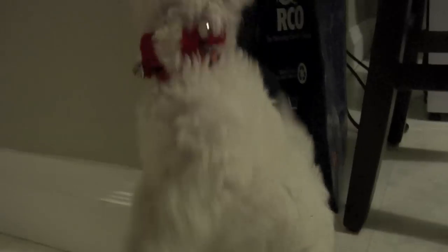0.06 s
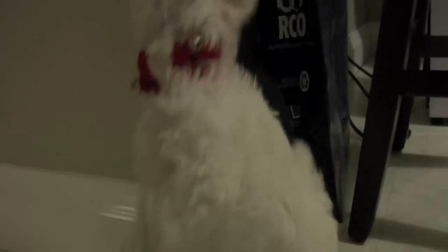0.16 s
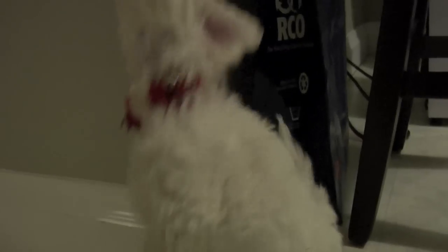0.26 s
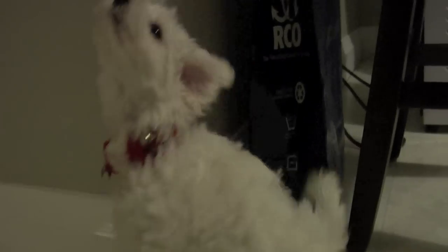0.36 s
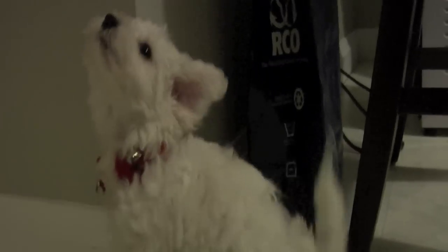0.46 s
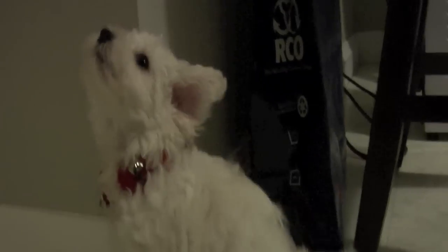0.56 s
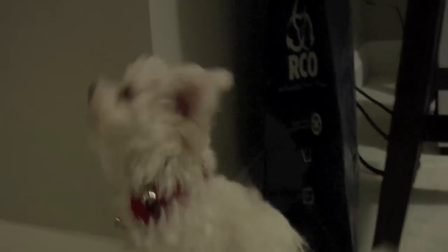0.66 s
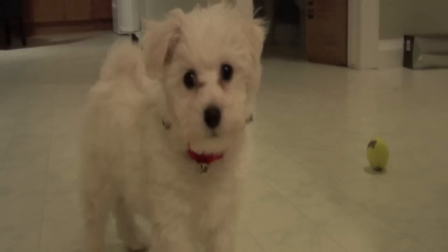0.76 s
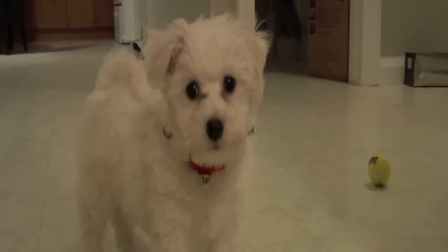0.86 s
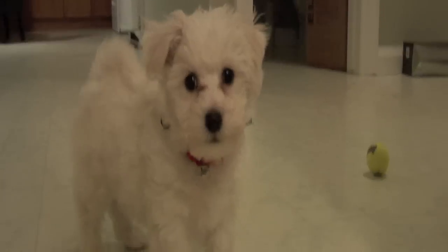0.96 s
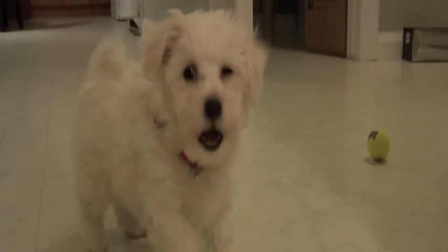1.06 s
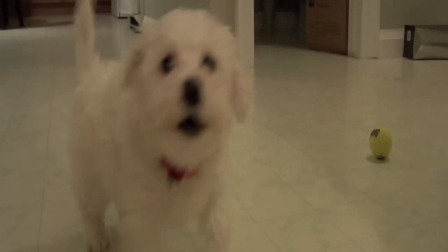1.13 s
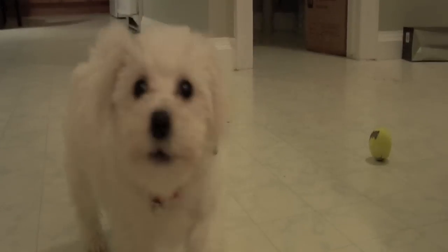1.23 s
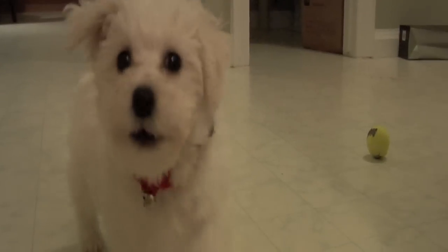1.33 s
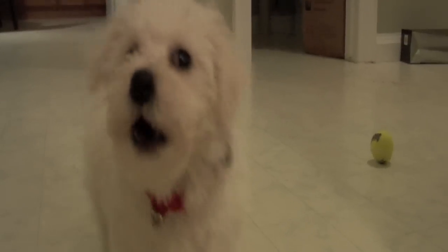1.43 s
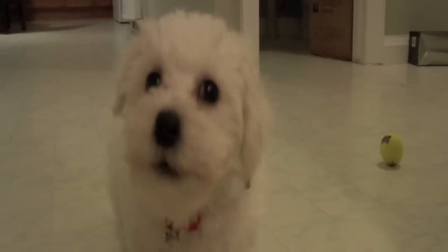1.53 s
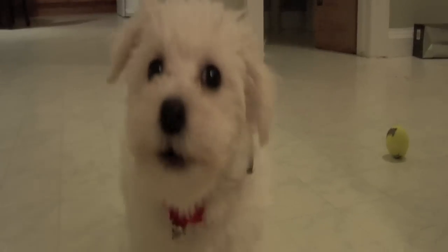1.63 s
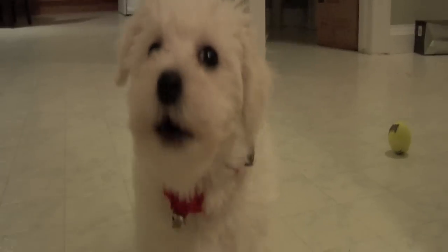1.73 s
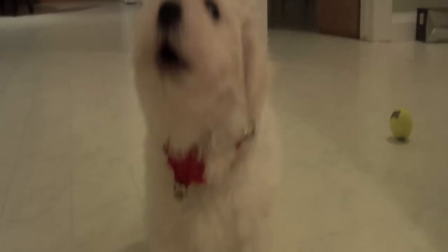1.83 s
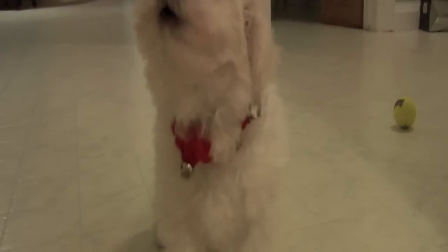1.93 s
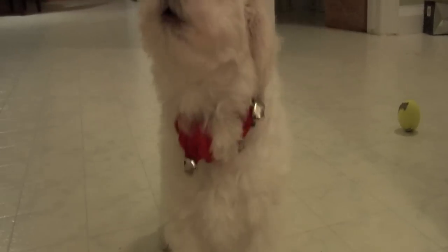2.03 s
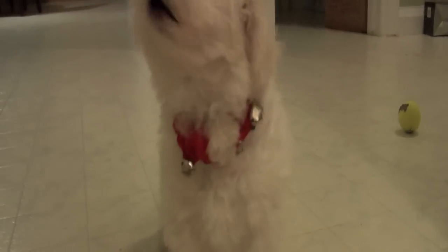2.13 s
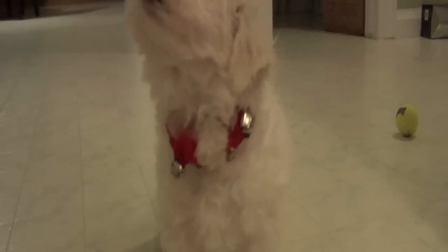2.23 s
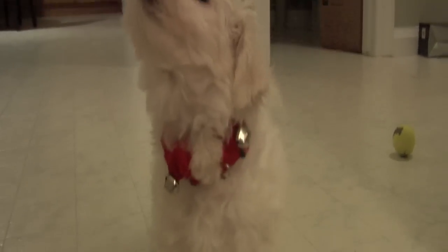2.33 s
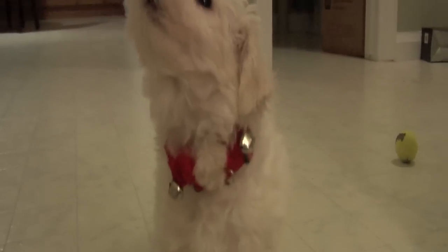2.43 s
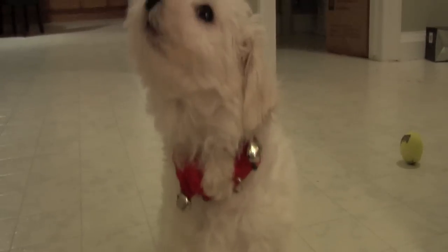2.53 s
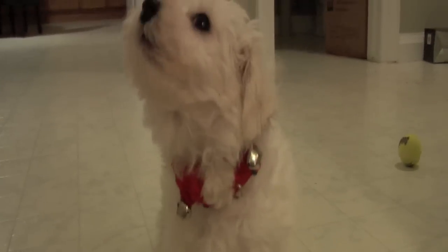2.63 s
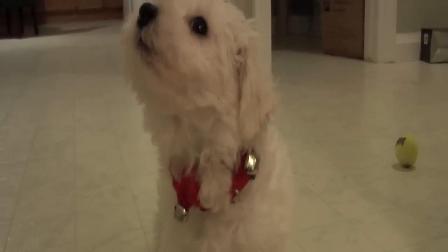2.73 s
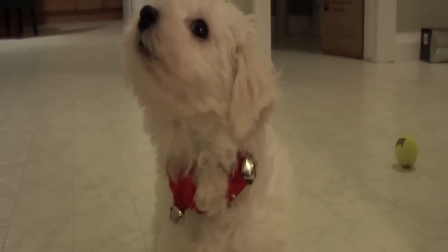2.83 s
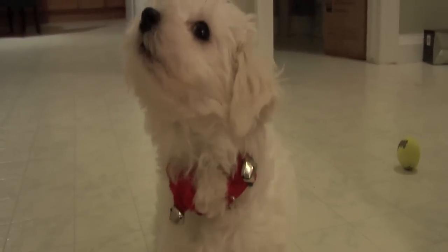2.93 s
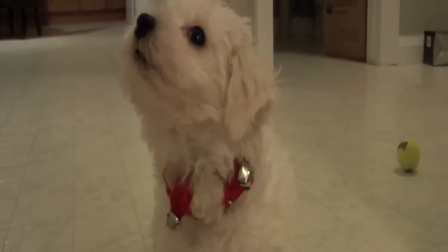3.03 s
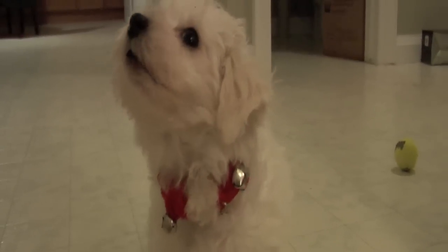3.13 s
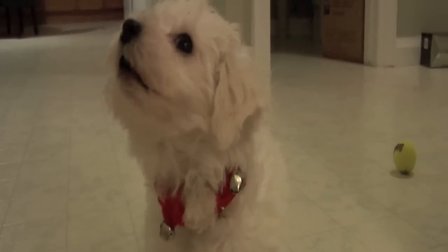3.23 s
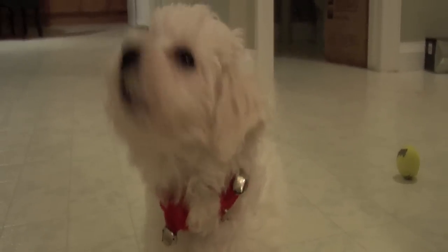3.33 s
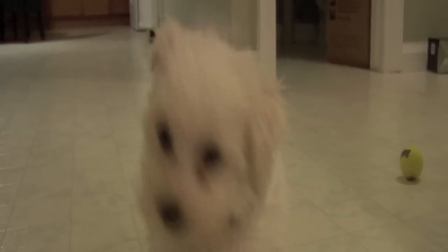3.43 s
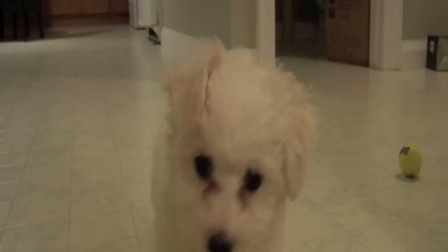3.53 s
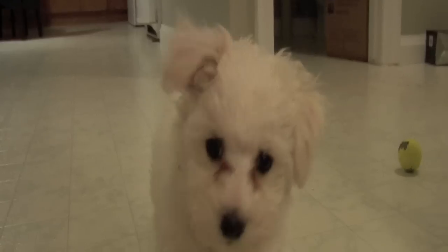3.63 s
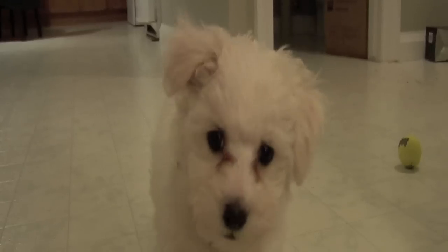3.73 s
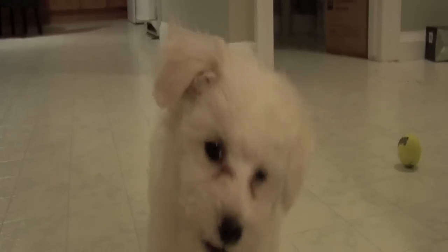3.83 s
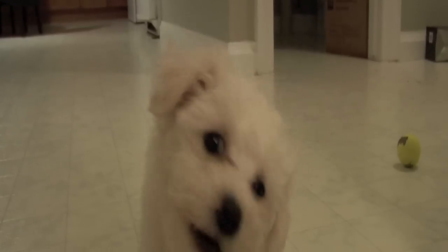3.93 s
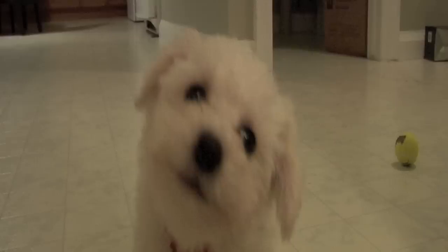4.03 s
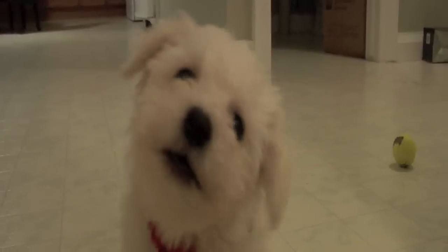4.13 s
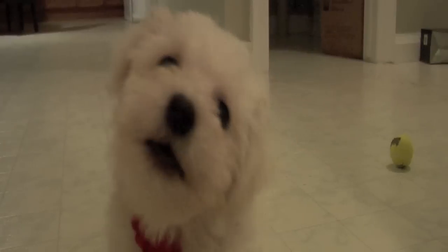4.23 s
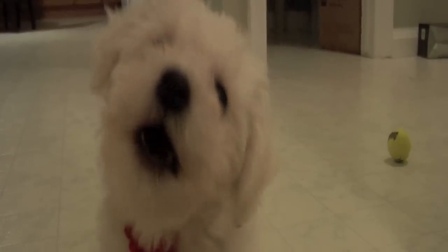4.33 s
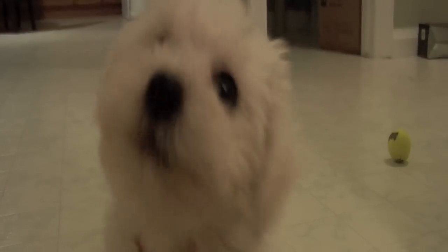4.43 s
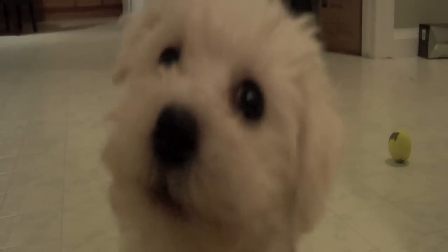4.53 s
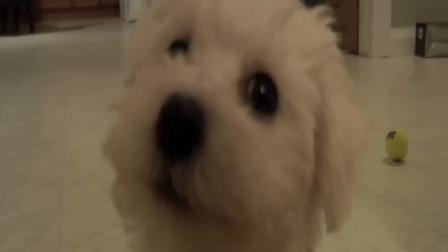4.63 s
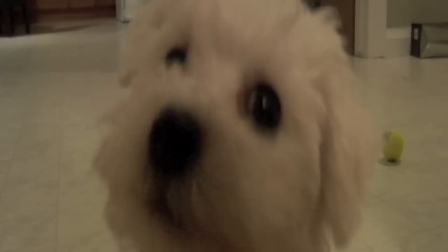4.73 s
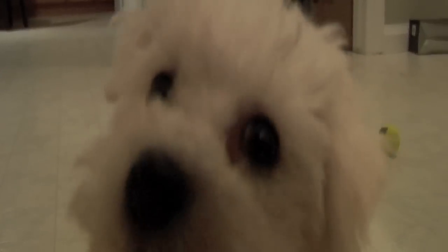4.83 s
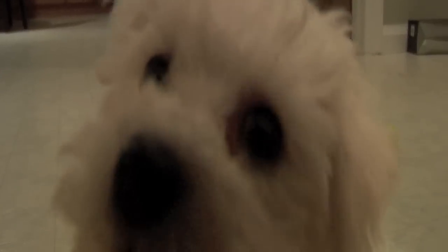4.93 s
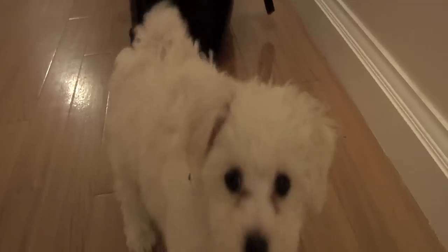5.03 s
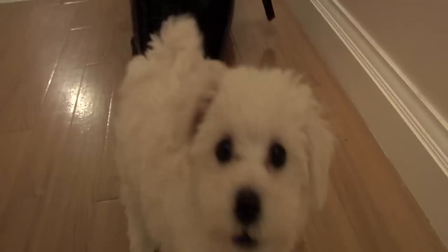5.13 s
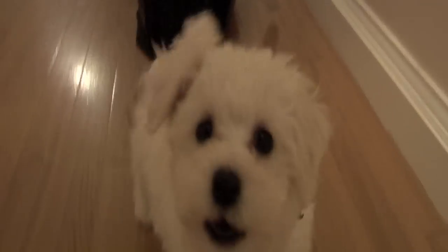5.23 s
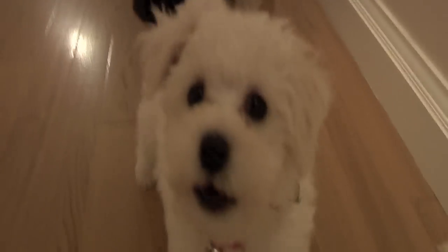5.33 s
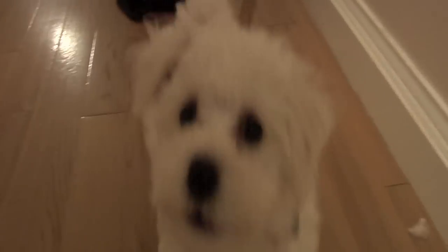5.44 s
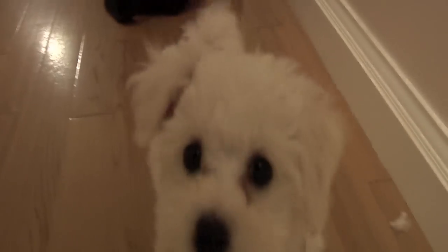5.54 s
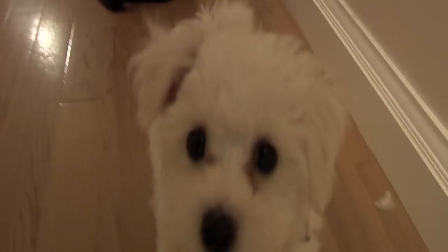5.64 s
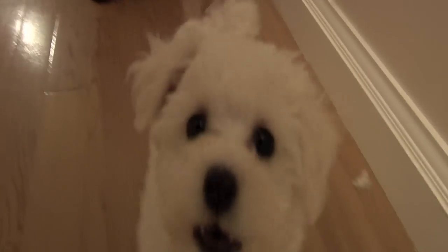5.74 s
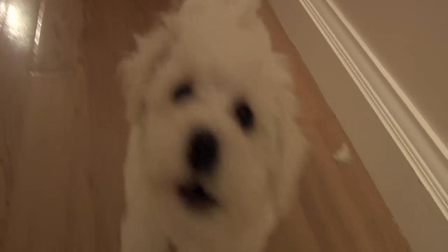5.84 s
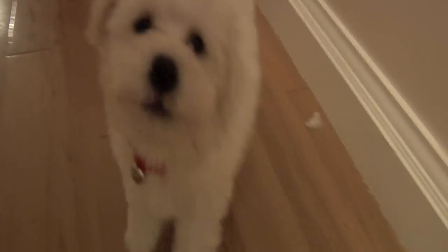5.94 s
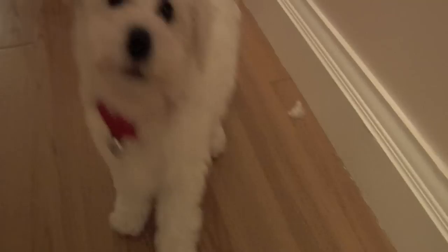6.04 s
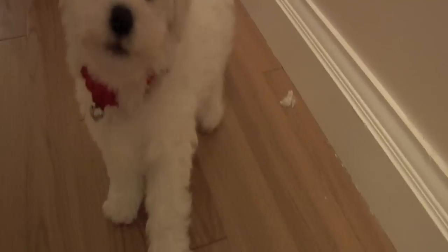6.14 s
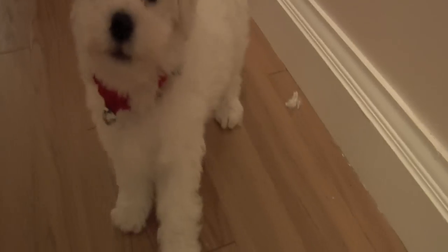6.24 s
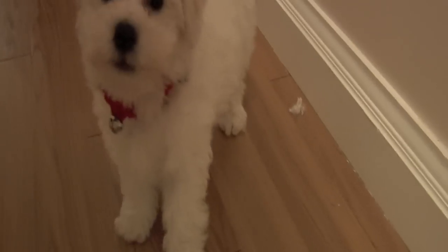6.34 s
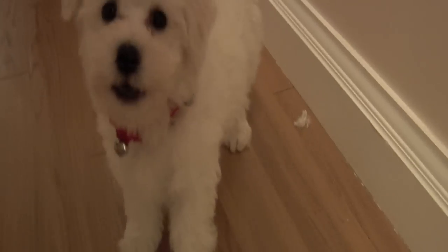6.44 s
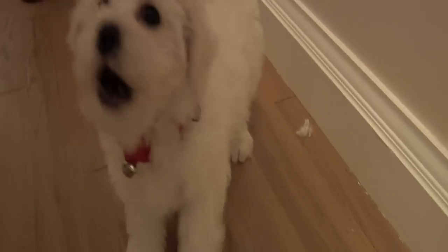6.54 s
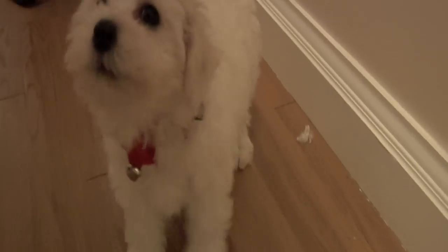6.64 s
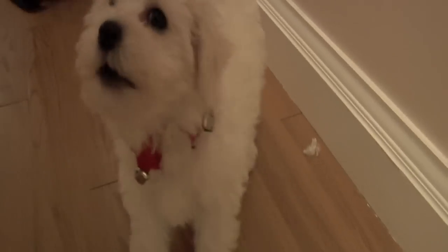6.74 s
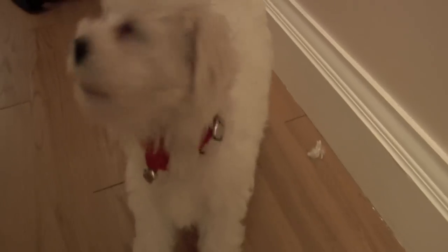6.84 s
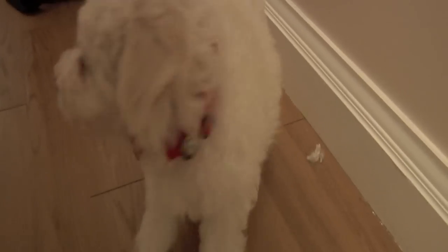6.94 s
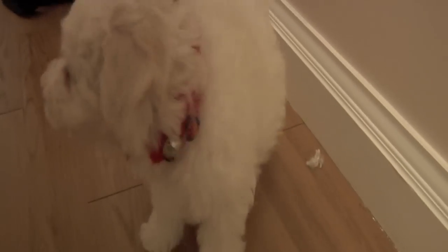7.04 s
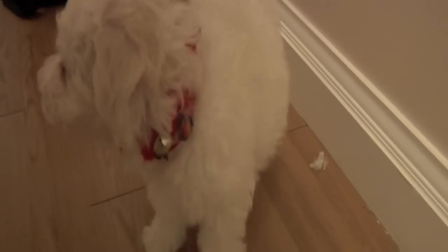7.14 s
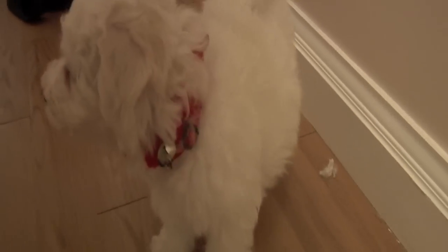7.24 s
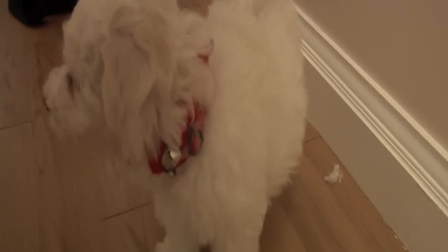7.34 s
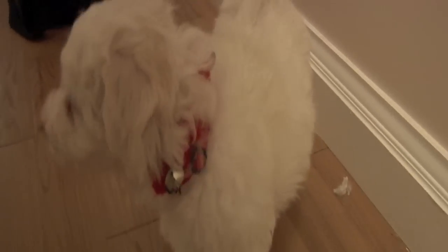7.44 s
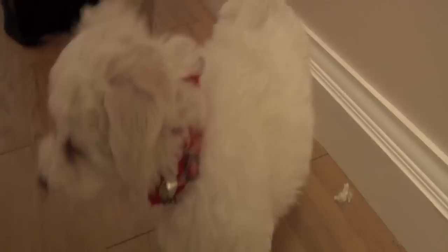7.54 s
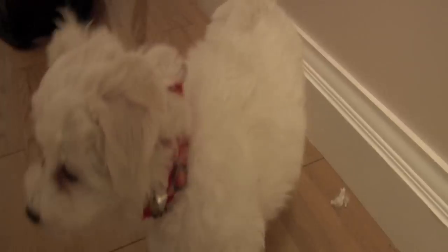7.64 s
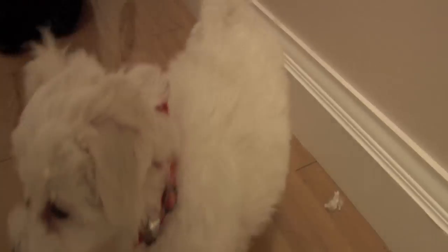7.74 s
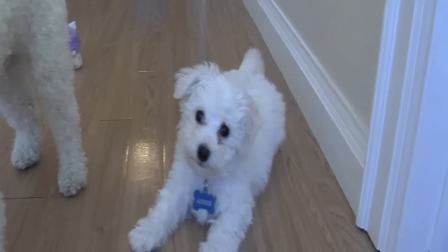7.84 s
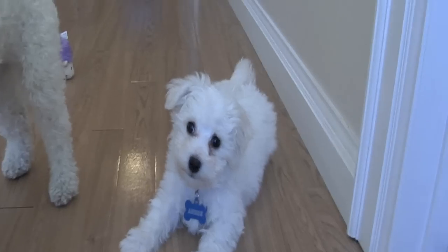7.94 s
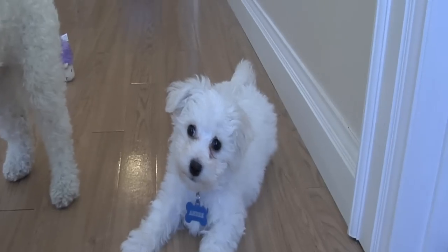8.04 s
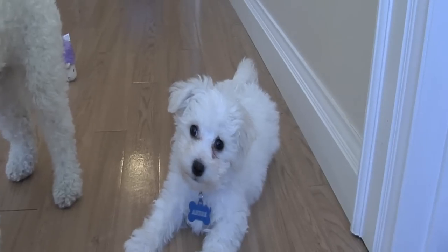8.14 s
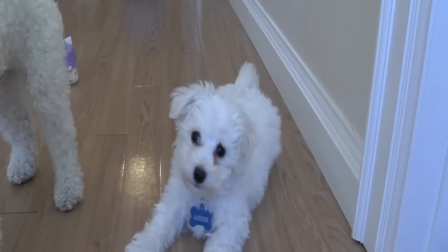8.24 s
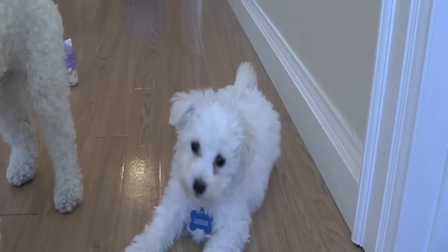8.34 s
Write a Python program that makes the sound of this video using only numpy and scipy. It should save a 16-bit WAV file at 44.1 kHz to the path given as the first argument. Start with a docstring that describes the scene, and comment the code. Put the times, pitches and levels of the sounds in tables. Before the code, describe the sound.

A little dog barks indoors, heard very near. Its yaps start gruff, leap high and often crack into a shrill squeal; between them low rough growls burst into brief woofs. A dull bump and click accompany the second yap. The hard room echoes every call. After the last yap at about six and a half seconds only faint hiss, hum and tiny taps remain, with quick fades between sections.

```python
"""In a hard-floored room, a small puppy yaps and growls close to the microphone, and the room rings.
Yaps swell from a gruff start and climb in pitch, and most crack into a shrill top; growls swell into woofs.
The voice is a stack of harmonics shaped by the throat; puffs, wheezes and taps are shaped noise.
Soft low thumps, a faint hum of sine tones and a hiss of noise join in.
The whole sound fades out briefly three times."""
import sys
import numpy as np
from scipy import signal
from scipy.fft import rfft, irfft
from scipy.io import wavfile
from scipy.ndimage import uniform_filter1d, minimum_filter1d, map_coordinates

SR = 44100
rng = np.random.default_rng(int(sys.argv[2]) if len(sys.argv) > 2 else 0)


def digitize_waveform(pressure):
    """Quantize a signal to 16-bit integers and store it at the path in sys.argv[1].

    Rows of a 2-D input are taken as channels; values are limited to [-1, 1].
    """
    field = np.atleast_2d(pressure).T
    bounded = np.clip(field, -1, 1)
    quanta = np.round(bounded * 32767).astype(np.int16)
    wavfile.write(sys.argv[1], SR, quanta)


N = 369558
TIME = np.arange(N) / SR  # seconds
EDGE_HZ = 15800  # nothing sounds above this


def gain_of(db):
    """Turns decibels into amplitude."""
    return 10 ** (np.asarray(db) / 20)


def evened(x):
    """Scales a sound to rms 1."""
    return x / np.sqrt(np.mean(abs(x) ** 2) + 1e-20)


def read(points, hz):
    """Reads a curve between its points on a log-frequency axis."""
    point_hz, value = np.transpose(points)
    return np.interp(np.log(hz + 1), np.log(point_hz), value)


def add(mix, start_s, sound):
    """Mixes a sound in at its start time."""
    part = mix[max(0, round(start_s * SR)):][:len(sound)]
    part += sound[:len(part)]


def noise(colour, size):
    """Makes noise of rms 1 with the given spectrum."""
    spectrum = rfft(rng.standard_normal(size))
    shape = gain_of(read(colour, np.fft.rfftfreq(size, 1 / SR)))
    return evened(irfft(spectrum * shape, size))


def wander(steps):
    """Smooth chance that takes a new value at each whole step."""
    return map_coordinates(rng.standard_normal(4096), [steps], order=3, mode="wrap")


def blurred_phasor(steps):
    """Smooth chance in two directions, for a tone whose strength and phase drift."""
    return wander(steps) + 1j * wander(steps)


def step(t, width):
    """Goes smoothly from 0 to 1 as t passes zero."""
    return .5 + .5 * np.tanh(t / width)


def bell(x, width, power=2):
    """A bump of height 1 around zero; a higher power flattens its top."""
    return np.exp(-abs(x / width) ** power)


def blend(a, b, share):
    """Goes from a to b as share goes from 0 to 1."""
    return a + (b - a) * share


HISS_DB = -64.5  # overall level
# The tone of the hiss. Each row: frequency in Hz, relative strength in dB.
HISS_COLOUR = [(25, -8.5), (60, 3), (110, 0.5), (250, -3.5), (600, 0), (1100, -8), (2000, -14.5),
               (4000, -16), (15000, -22)]
# The tones of the hum. Each row: frequency in Hz, rms level in dB.
HUM_TONES = [(53.8, -81.5), (598.5, -68.5)]


def background(waver=.2):
    """An appliance hums in sine tones of slightly wavering phase, over a soft hiss of noise."""
    hum = np.zeros(N)
    for hz, db in HUM_TONES:
        phase = 2 * np.pi * hz * TIME + waver * wander(TIME * 9)
        hum += gain_of(db) * np.sqrt(2) * np.sin(phase)
    return hum + gain_of(HISS_DB) * noise(HISS_COLOUR, size=N)


# Dull low thumps. Each row: start in seconds, pitch in Hz, level in dB, time to swell in seconds.
LOW_THUMPS = [(1.094, 310, -28.5, .008), (1.122, 69.6, -47.5, .005), (4.79, 77.4, -54, 0.02),
              (6.88, 221, -38.5, 0.008)]


def thumps(width=.3):
    """Soft bumps: a narrow band of bass that swells and dies."""
    out, t = np.zeros(N), TIME[:SR // 3]
    for start_s, hz, db, swell_s in LOW_THUMPS:
        body = np.sin(2 * np.pi * hz * t + wander(t * hz * width))
        swell = t / swell_s * np.exp(1 - t / swell_s)
        add(out, start_s, gain_of(db) * body * swell)
    return out


# The tone of the taps. Each row: frequency in Hz, relative strength in dB.
TAP_TONE = [(60, -2.5), (200, 8.5), (700, 1.5), (14000, -24.5)]
# Light taps and clicks. Each row: start in seconds, level in dB, decay in seconds.
LIGHT_TAPS = [(1.125, -18.5, 0.0073), (3.319, -36, 0.0036), (6.886, -45, 0.041), (7.775, -52.5, 0.011),
              (7.945, -39.5, 0.0068)]


def taps():
    """Short dull clicks with no ring: noise that dies away at once."""
    out, t = np.zeros(N), TIME[:4096]
    for start_s, db, decay_s in LIGHT_TAPS:
        add(out, start_s, gain_of(db) * noise(TAP_TONE, size=len(t)) * np.exp(-t / decay_s))
    return out


# The tone of the puffs. Each row: frequency in Hz, relative strength in dB.
PUFF_TONE = [(500, 3.5), (2700, -5), (4500, -9), (8000, -5.5), (15000, -31.5)]
# Air blown out through the muzzle with a call. Each row: start in seconds, level in dB.
AIR_PUFFS = [(1.102, -55), (1.412, -61), (2.6, -57), (3.372, -49), (4.348, -55.5), (5.086, -60.5),
             (5.442, -60.5)]


def puffs(swell_s=0.051):
    """A soft rush of air: noise that swells and dies."""
    out, u = np.zeros(N), TIME[:SR // 2] / swell_s
    for start_s, db in AIR_PUFFS:
        add(out, start_s, gain_of(db) * noise(PUFF_TONE, size=len(u)) * u * np.exp(1 - u))
    return out


# Air hissing in a narrow muzzle resonance that sinks as the mouth opens.
# Each row: start in seconds, length in seconds, first pitch in Hz, last pitch in Hz, level in dB.
MUZZLE_WHEEZES = [(1.098, .078, 3320, 2940, -17.5), (3.315, .05, 3500, 2850, -55),
                  (4.361, .11, 3760, 3150, -42), (5.092, 0.043, 3490, 3180, -32),
                  (5.415, .09, 3930, 3750, -61)]


def wheezes(width_hz=330, late=1.57):
    """A narrow band of breath noise that swells while it sinks ever faster."""
    out = np.zeros(N)
    for start_s, length_s, start_hz, end_hz, db in MUZZLE_WHEEZES:
        t = np.arange(0, length_s, 1 / SR)
        turns = np.cumsum(blend(start_hz, end_hz, (t / length_s) ** 2)) / SR
        band = blurred_phasor(t * width_hz) * np.exp(2j * np.pi * turns)
        swell = np.sin(np.pi * (t / length_s) ** late)
        add(out, start_s, gain_of(db) * band.real * swell)
    return out


# How long the room rings. Each row: frequency in Hz, time to die by 60 dB in seconds.
RING_TIME = [(250, 0.6), (1200, 0.9565), (3300, 0.7653), (5000, 1), (10000, 0.5)]
# The tone of the room. Each row: frequency in Hz, strength in dB.
ROOM_TONE = [(150, -2), (800, -2), (3600, -5.5), (8000, -9.5), (14000, -22.5)]


def room(x, build_s=.022, early_db=-10):
    """A few near reflections, then dense echoes that die at each band's own speed."""
    size = int(1.5 * SR)
    echoes = rng.choice([-1., 1.], size) * (rng.random(size) < 4000 / SR)
    hz, t, bands = signal.stft(echoes, SR, nperseg=256)
    decay = gain_of(-60 * t / read(RING_TIME, hz)[:, None])
    bands = bands * decay * (1 - np.exp(-t / build_s))
    plain = signal.istft(bands, SR, nperseg=256)[1]
    # unit gain around 1 kHz
    plain /= np.sqrt(np.mean(abs(rfft(plain, SR * 2)[1400:3000]) ** 2))
    near = (rng.uniform(.003, .03, 8) * SR).astype(int)
    plain[near] += gain_of(early_db) * rng.choice([-1., 1.], len(near)) / np.sqrt(len(near))
    tone = gain_of(read(ROOM_TONE, np.fft.rfftfreq(len(plain), 1 / SR)))
    tail = irfft(rfft(plain) * tone)
    return signal.fftconvolve(x, tail)[:len(x)]


# shares of breath in the high partials, hoarseness when shut, and slow rattle in a growl
AIR, HOARSE, RATTLE = .011, .09, .25
# The throat with the muzzle nearly shut, then open. Each row: frequency in Hz, strength in dB.
SHUT_THROAT = [(150, -0.5), (200, -1.5), (270, 1), (400, -7.5), (600, 0.5), (800, -6), (1100, -16),
               (1800, -10.5), (2600, -36.5), (3700, -35), (5000, -68.5), (8000, -50.5), (10700, -55),
               (13000, -67)]
OPEN_THROAT = [(200, -16.5), (400, -9), (700, 3), (900, 2), (1200, -3), (1750, 0.5), (2600, -12),
               (3500, -27.5), (5000, -41), (7000, -47), (9000, -54.5), (10500, -43.5), (15000, -57)]
# Where mouth opening lifts the second resonance, and where strain lifts the upper partials.
# Each row: frequency in Hz, share of the lift (0 to 1).
MOUTH_LIFT = [(1100, 0), (1600, 1), (2650, 1), (3100, 0)]
STRAIN_LIFT = [(2650, 0), (3100, 1), (4500, 1), (7000, .4)]


def voice(t, hz, level_db, mouth_db, strain_db, rough, jitter=0.031, smear=0.67, side_depth=.2,
          side_hz=490, crack_hz=1190, opens_hz=270, uneven_db=-6, woof_hz=400):
    """Harmonics of the vocal folds through the throat; roughness makes each cycle differ from the last."""
    rough = np.clip(rough, 0, 1)
    hz = hz * (1 + jitter * rough * wander(t * 300))
    turns = np.cumsum(hz) / SR
    # the muzzle opens as the pitch leaves the growl range
    opening = np.clip((hz - opens_hz) / 80, 0, 1)
    # in a woof, strong and weak pulses alternate: the odd lines stay faint
    odd_db = uneven_db * bell(hz - woof_hz, 90)
    steps = smear * np.cumsum(np.minimum(hz, 750)) / SR
    sound, power = np.zeros(len(t)), 1e-20
    for k in range(1, int(EDGE_HZ / hz.min()) + 1):
        f = k * hz
        throat_db = (1 - opening) * read(SHUT_THROAT, f) + opening * read(OPEN_THROAT, f)
        lift_db = mouth_db * read(MOUTH_LIFT, f) + strain_db * read(STRAIN_LIFT, f)
        height = gain_of(throat_db + k % 2 * odd_db + lift_db) * (f < EDGE_HZ)
        # high partials dissolve into turbulence first, most of all in a growl
        breath = AIR * (f / 1000) ** 2 + HOARSE * (1 - opening) * f / 1000
        loose = np.clip(rough * (1 + f / 5000) + breath, 0, 1)
        # the fundamental blurs least
        scatter = blurred_phasor(steps * np.sqrt(min(k, 3))) / np.sqrt(2)
        steadiness = np.sqrt(1 - loose ** 2) + loose * scatter
        sound += height * (steadiness * np.exp(2j * np.pi * k * turns)).real
        power = power + height ** 2 / 2
    # in the shrill register a second vibration adds side tones; growls rattle slowly
    shrill = np.clip((hz - crack_hz) / 50, 0, 1)
    sound *= 1 + side_depth * shrill * np.cos(2 * np.pi * side_hz * t + wander(t * 60))
    sound *= np.exp(RATTLE * rough * (1 - opening) * wander(t * 80))
    ends = np.clip(np.minimum(t - t[0], t[-1] - t) / .003, 0, 1)
    return t[0], sound / np.sqrt(power) * gain_of(level_db) * ends, hz, rough


# the growl is rough and low; after the woof it sinks, fades and dulls as the muzzle shuts
GROWL_HZ, GROWL_ATTACK_S, GROWL_RELEASE_S = 212.1, .05, .04
GROWL_MOUTH_DB, GROWL_STRAIN_DB = -5.5, -13.5
SAG_HZ_PER_S, SAG_DB_PER_S, SHUT_DB, SHUT_S = 110, 30.5, -14.5, .09
# Growls that swell into a woof. Each row: middle of the woof in seconds, its half length in seconds,
# growl before and growl after in seconds, top pitch in Hz, woof level and growl level in dB,
# mouth opening in dB, strain in dB, roughness of the woof and of the growl (0 to 1),
# base level sent to the room in dB.
GROWLED_WOOFS = [(0.296, 0.02, 0.044, 0.42, 286.5, -22.5, -32, 5, -13.5, .6, 0.64, -10),
                 (2.63, .032, 0.36, 0.07, 406.8, -11, -30.5, -8.5, -18.5, 0.06, 0.88, -10),
                 (3.409, 0.031, .08, 0.041, 447, -14, -28, -0.5, -11.5, 0.2, .7, -5),
                 (4.451, .055, .117, .29, 275, -19, -26, 3, -3, 0.16, 0.79, -12),
                 (5.533, .022, .119, 0.051, 353.8, -13, -27, -7.5, -22, 0.33, 0.6, -11.5)]


def woof(s, half, before, after, top_hz, woof_db, growl_db, mouth_db, strain_db, woof_rough, growl_rough,
         flat_top=4.5, gradual=0.45, reach=2.1, level_top=2.2, start_db=-12, stop_db=-14):
    """Controls of one growl: it rises gradually, jumps to the level pitch of a woof and drops back."""
    t = np.arange(-before, after, 1 / SR)
    push, since = bell(t, half * reach), np.maximum(t, 0)
    lift = blend(bell(t, half, power=flat_top), push, gradual)
    effort = blend(bell(t, half, power=level_top), push, gradual)
    attack_db = start_db * np.clip(1 - (t + before) / GROWL_ATTACK_S, 0, 1)
    release_db = stop_db * np.clip(1 - (after - t) / GROWL_RELEASE_S, 0, 1)
    shut_db = SHUT_DB * (1 - np.exp(-since / SHUT_S))
    hz = blend(GROWL_HZ - SAG_HZ_PER_S * since, top_hz, lift)
    level = blend(growl_db - SAG_DB_PER_S * since + attack_db + release_db, woof_db, effort)
    mouth = blend(GROWL_MOUTH_DB, mouth_db, effort) + shut_db
    strain = blend(GROWL_STRAIN_DB, strain_db, effort) + shut_db
    return s + t, hz, level, mouth, strain, blend(growl_rough, woof_rough, lift)


# pitch: it snaps up from a gruff note, may overshoot, climbs, may crack upward into a low arch, and falls
GRUFF_HZ, SNAP_S, OVERSHOOT_AT_S, OVERSHOOT_S = 230, .003, .017, .013
CRACK_RATIO, CRACK_S, ARCH_HZ = 1.115, .003, 35
FALL_HZ_PER_S, FALL_S, TURN_S = 15500, 0.042, .004
SHRILL_MIN_S = .009  # a yap cracks only if its shrill top lasts longer than this
# level: the lead-in swells, the climb crests midway, the shrill top starts thinner and swells with its arch
GRUFF_DB, GRUFF_SWELL_DB_PER_S, GRUFF_ATTACK_S = -22.5, 283, .012
SHRILL_DB, SHRILL_STRAIN_DB, CREST_DB, ARCH_DB = -4.5, -3.5, 2, 4
DULL_DB_PER_S = 650.5  # the fall dulls as it fades
# the fundamental booms as it passes the mouth's first resonance
BOOM_HZ, BOOM_WIDTH_HZ, BOOM_DB, BOOM_PURITY_DB = 985, 100, 4, 7.5
# roughness (0-1) of the clear voice, the lead-in and the rasp; then what the crack and the fall add
CLEAR_ROUGH, GRUFF_ROUGH, RASP_ROUGH, CRACK_ROUGH, FALL_ROUGH = .02, .42, .55, .27, .18
GRUFF_MOUTH_DB, GRUFF_STRAIN_DB, RASP_MOUTH_DB = 0.5, -3, 7
# an overshoot of SQUEAL_HZ or more clears this share of the rasp
SQUEAL_HZ, SQUEAL_CLEARS = 150, 0.27
# The yaps. Each row: start of the climb in seconds; gruff lead-in, climb, shrill top and rasp in seconds;
# pitch at the foot and at the end of the climb in Hz, bow of the climb (0 straight, 1 levelling off),
# overshoot in Hz, base level in dB, swell over the climb in dB, final fade in dB per second,
# mouth opening in dB, wider opening in the shrill top in dB, strain in dB,
# change of strain over the climb in dB, base level sent to the room in dB.
PUPPY_YAPS = [(-.06, 0.011, 0.049, .058, 0.034, 900, 1101, -0.32, -2, -12, 1, 999, 2.5, 14, 7.5, -3, -10.5),
              (1.103, .012, 0.059, 0.049, .06, 900, 1141, 0.075, 460, -11, -2.5, 417, 0, 12, 14.5, -3.5, -10),
              (1.429, .037, .048, .062, 0.0049, 897, 1149, -0.4, -5.5, -8, -5.5, 300, -3.5, 15.5, 5.5, -6, -11),
              (1.859, 0.06, 0.064, 0.044, 0.013, 777, 1100, .2, 4, -12.5, -4.5, 280, -4, 7.5, -6, 6, -7),
              (3.957, 0.011, .061, .014, 0.011, 804, 1024, .9, -72.5, -14.5, 3.5, 280, 0.5, 1, 34.5, -38.5, -7),
              (5.09, .035, .078, 0.0075, 0.028, 752, 870.8, 0.8, 175.5, -21.5, 13, 518, 2, 0, 8, -3, -8.5),
              (5.884, 0.033, 0.084, 0.005, 0.0049, 724, 1137, .2, -7, -14.5, -5.5, 560, -3.5, 4, 14.5, -24.5, -9),
              (6.545, 0.00928, 0.074, 0.021, 0.031, 848, 1136, 0.98, 288, -12, -3, 700, -2, 19.5, 11, 0, -8)]


def yap(s, lead, climb, shrill, rasp, foot_hz, top_hz, bow, overshoot_hz, level_db, swell_db,
        fade_db_per_s, mouth_db, wider_db, strain_db, relax_db):
    """Controls of one yap: gruff lead-in, raspy snap, climb, possible crack into the shrill register, fall."""
    t = np.arange(-lead, climb + shrill + FALL_S, 1 / SR)
    voiced, climbed = step(t, SNAP_S), np.clip(t / climb, 0, 1)
    overshoot = bell(t - OVERSHOOT_AT_S, OVERSHOOT_S, power=3)
    cleared = overshoot * np.clip(SQUEAL_CLEARS * min(overshoot_hz / SQUEAL_HZ, 1), 0, 1)
    rasping = step(rasp - t, SNAP_S) * (1 - cleared)
    cracks = shrill > SHRILL_MIN_S
    cracked = cracks * step(t - climb, CRACK_S)
    arch = cracks * np.sin(np.pi * np.clip((t - climb) / max(shrill, CRACK_S), 0, 1))
    # seconds since the fall began, with a rounded start
    falling_s = TURN_S * np.logaddexp(0, (t - climb - shrill) / TURN_S)
    bowed = climbed + bow * climbed * (1 - climbed)

    hz = blend(foot_hz, top_hz, bowed) + overshoot_hz * overshoot
    hz = hz * blend(1, CRACK_RATIO, cracked) + ARCH_HZ * arch - FALL_HZ_PER_S * falling_s
    hz = np.maximum(hz, GRUFF_HZ)

    boom = bell(hz - BOOM_HZ, BOOM_WIDTH_HZ) * (1 - rasping)
    dull_db = BOOM_PURITY_DB * boom + DULL_DB_PER_S * falling_s
    climb_db = swell_db * (bowed - .5) + CREST_DB * np.sin(np.pi * climbed)
    top_db = SHRILL_DB * cracked + ARCH_DB * arch
    level = level_db + climb_db + BOOM_DB * boom + top_db - fade_db_per_s * falling_s
    mouth = mouth_db + RASP_MOUTH_DB * rasping + wider_db * cracked - dull_db
    strain = strain_db + relax_db * climbed + SHRILL_STRAIN_DB * cracked - dull_db
    crack_rough = CRACK_ROUGH * cracks * bell(t - climb - CRACK_S, 2 * CRACK_S)
    rough = blend(CLEAR_ROUGH, RASP_ROUGH, rasping) + crack_rough + FALL_ROUGH * falling_s / FALL_S

    gruff_db = GRUFF_DB + GRUFF_SWELL_DB_PER_S * np.minimum(t, 0)
    gruff_db = gruff_db - 20 * np.exp(-2 * (t + lead) / GRUFF_ATTACK_S)
    gruff = GRUFF_HZ, gruff_db, GRUFF_MOUTH_DB, GRUFF_STRAIN_DB, GRUFF_ROUGH
    clear = hz, level, mouth, strain, rough
    return s + t, *(blend(a, b, voiced) for a, b in zip(gruff, clear))


LEAD = SR // 10  # samples: the first yap is already under way at time zero


def puppy(carry_db=9, carry_hz=980, chest_hz=182):
    """All calls, direct and through the room; the clear, shrill tops carry furthest."""
    direct, sent = np.zeros((2, LEAD + N))
    calls = [(yap(*row), db) for *row, db in PUPPY_YAPS]
    calls += [(woof(*row), db) for *row, db in GROWLED_WOOFS]
    for controls, send_db in calls:
        start_s, sound, hz, rough = voice(*controls)
        shrill = np.clip((hz - carry_hz) / 150, 0, 1) * (1 - rough)
        add(direct, start_s + LEAD / SR, sound)
        add(sent, start_s + LEAD / SR, sound * gain_of(send_db + carry_db * shrill))
    # so small a body radiates no bass
    no_bass = signal.butter(7, chest_hz, "highpass", fs=SR, output="sos")
    return signal.sosfilt(no_bass, direct + room(sent))[LEAD:]


def scene():
    """The room's background, small thumps and taps, the puppy's breath and its voice."""
    return (background() + thumps() + taps() + puffs() + wheezes() + puppy())[None]


# Brief fades of the whole sound. Each row: moment of silence in seconds, time to fade out in seconds.
BRIEF_FADES = [(0.813, 0.06), (5.055, 0.082), (7.87, 0.084)]


def record(dry, ceiling=0.61, back_s=0.05, lopsided=0.042):
    """A fast limiter holds the loudest peaks; then uneven bending, three brief fades and the band limit."""
    allowed = np.minimum(1, ceiling / (abs(dry) + 1e-9))
    x = dry * uniform_filter1d(minimum_filter1d(allowed, size=260), size=200)
    # the microphone bends unevenly, so each loud bark brings a faint low thump
    x = x + lopsided * x ** 2
    for silent_s, out_s in BRIEF_FADES:
        away = np.maximum((silent_s - TIME) / out_s, (TIME - silent_s) / back_s)
        x = x * np.clip(away, 0, 1) ** 2
    band_limit = signal.firwin(511, EDGE_HZ, window=("kaiser", 9), fs=SR)
    return signal.oaconvolve(x, band_limit[None], "same")


dry = scene()
out = record(dry)
digitize_waveform(out)
```